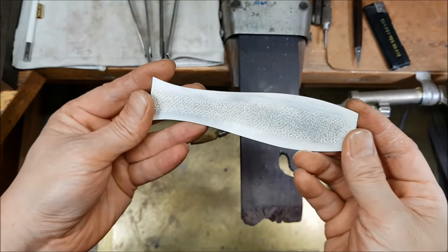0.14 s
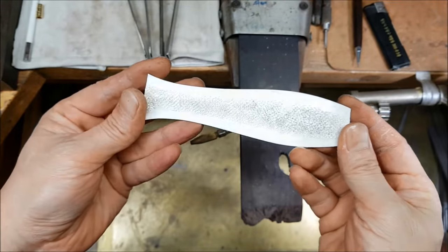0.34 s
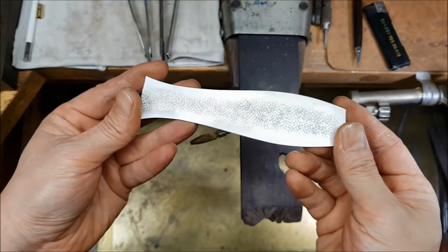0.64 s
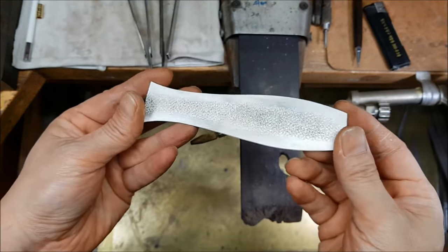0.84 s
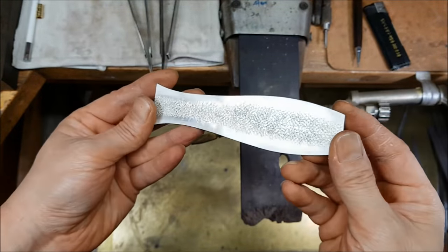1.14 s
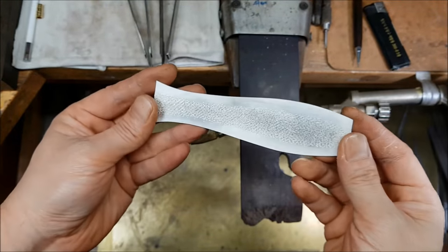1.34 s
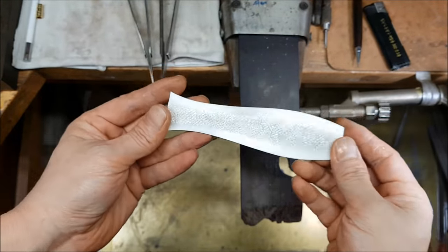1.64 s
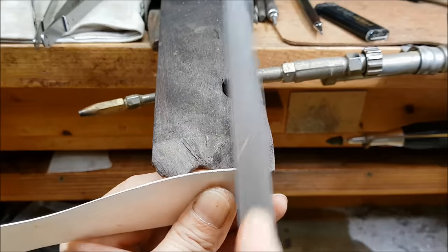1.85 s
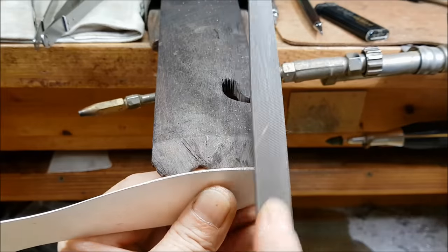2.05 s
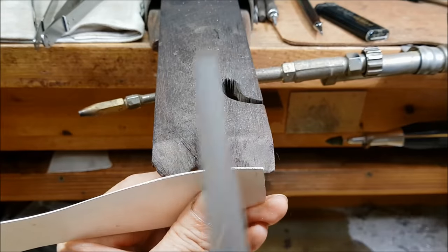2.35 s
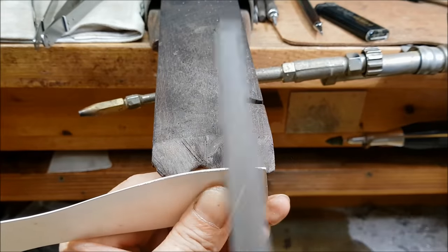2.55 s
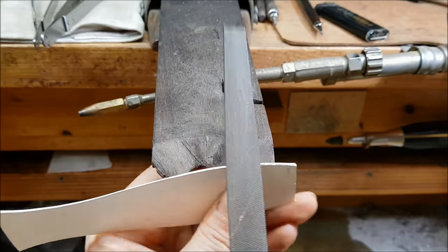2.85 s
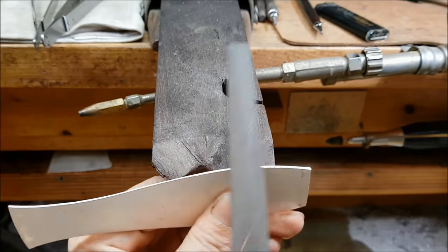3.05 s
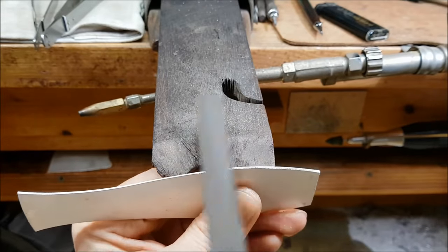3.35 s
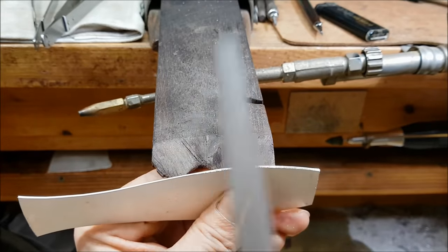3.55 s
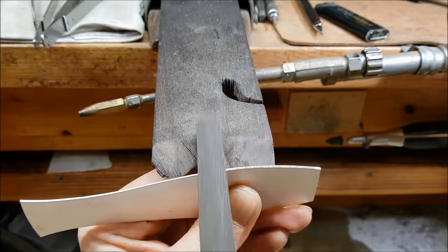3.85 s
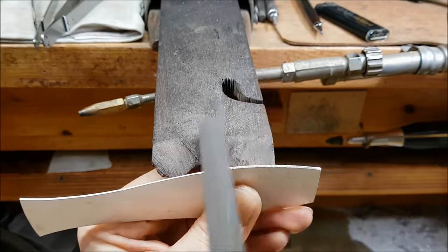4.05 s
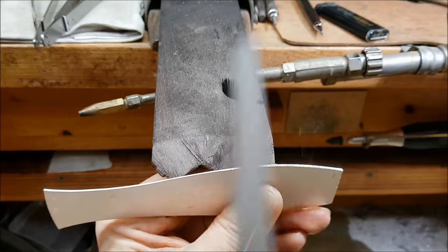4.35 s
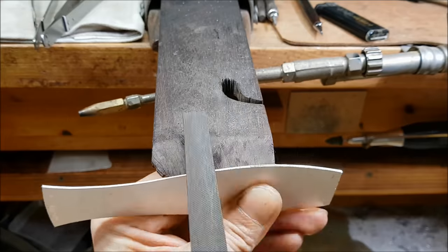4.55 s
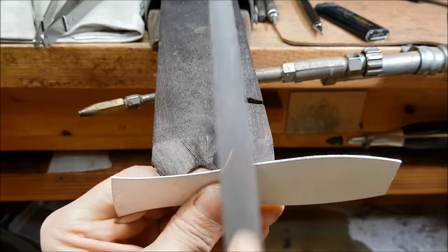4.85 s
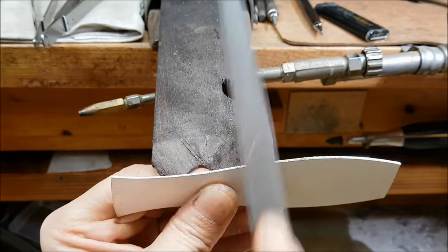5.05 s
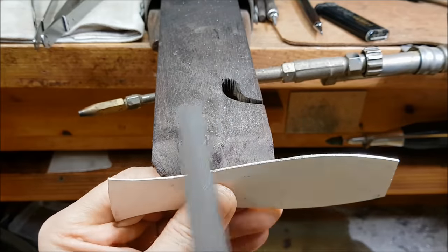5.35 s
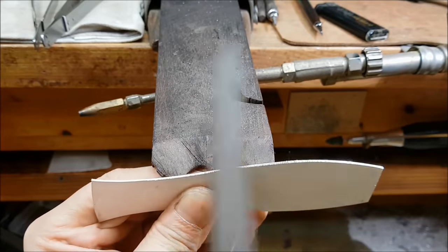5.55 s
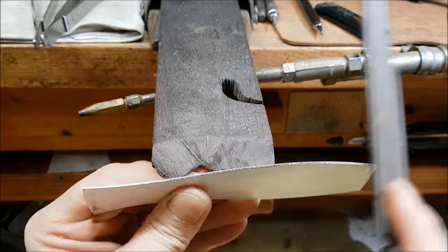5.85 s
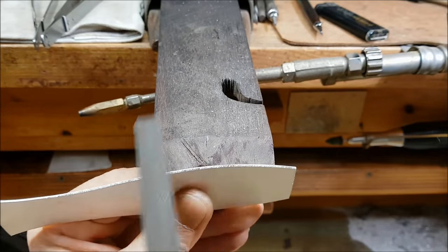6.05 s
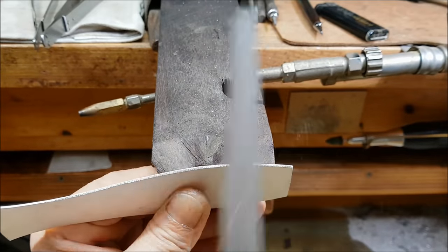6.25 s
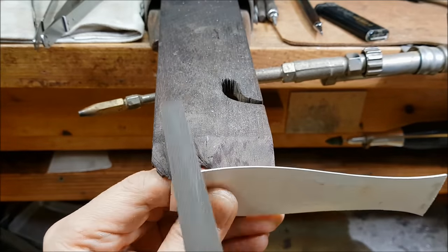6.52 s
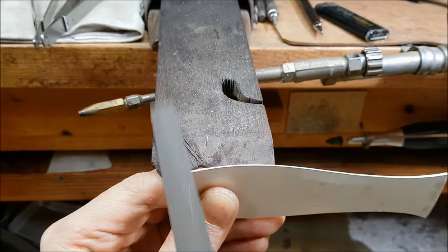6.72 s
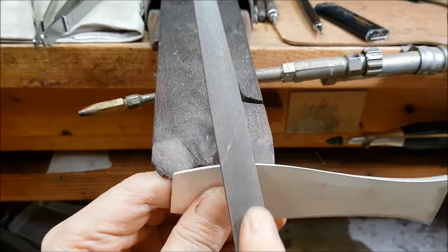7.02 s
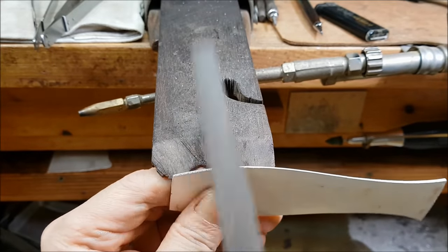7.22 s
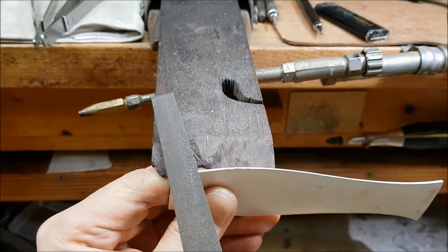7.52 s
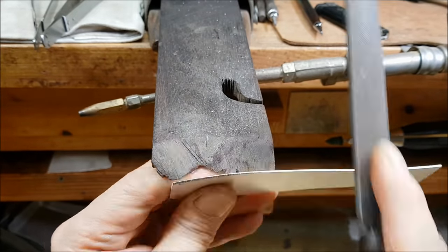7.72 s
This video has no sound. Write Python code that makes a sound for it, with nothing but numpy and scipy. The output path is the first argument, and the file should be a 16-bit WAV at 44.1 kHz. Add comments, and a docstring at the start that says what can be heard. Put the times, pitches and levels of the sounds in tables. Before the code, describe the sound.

After near silence with two faint finger brushes, a hand file rasps rapidly back and forth on thin sheet metal, first slower, then faster and brighter.

```python
"""A jeweller files the edge of a silver blank against a wooden bench pin, heard by a pair of microphones.
Over low rumble, shaped noise, fingers first brush the blank: two faint puffs of noise. Then pushes and pulls
of the file alternate, long ones first, after them quick short ones in another grip. Tooth impulses at a rate
that follows the file's speed, hissing chips and bursts of chatter excite the resonances of the held sheet.
Some teeth snag and ring, the resting file ticks in a pause, and dull bumps gather in the last strokes."""
import sys
import numpy as np
from scipy import signal
from scipy.fft import rfft, irfft, next_fast_len
from scipy.io import wavfile
from scipy.ndimage import uniform_filter1d, map_coordinates

SR = 44100
rng = np.random.default_rng(int(sys.argv[2]) if len(sys.argv) > 2 else 0)


def bounce(signal):
    """Save signal as a 16-bit WAV file at the path given by the first command-line argument."""
    frames = np.transpose(np.atleast_2d(signal))
    limited = np.clip(frames, -1, 1)
    pcm = np.round(limited * 32767).astype(np.int16)
    wavfile.write(sys.argv[1], SR, pcm)


N = 347508

TOP_HZ = 15950  # centre of the upper band edge
SPAN = 8192  # samples in one short sound
T = np.arange(SPAN) / SR
HZ = np.fft.rfftfreq(SPAN, 1 / SR)

# filing starts abruptly here, mid-stroke: t/s
ABRUPT_STARTS = [1.796, 4.832, 6.0, 6.634]
# phase by which the left microphone leads: f/Hz, phase/rad
LEFT_LEAD = [(100, -0.5), (700, 0.32), (1400, 0.47), (2300, 1.5), (4300, 1.01), (7000, 4), (10000, 3.5),
             (16000, 3)]


def amp(db):
    """Amplitude ratio of a level in dB."""
    return 10 ** (np.asarray(db) / 20)


def unit(x):
    """Normalisation to rms 1."""
    return x / np.sqrt(np.mean(x ** 2) + 1e-20)


def along(points, hz):
    """Interpolation of (f/Hz, value) points on a logarithmic frequency axis."""
    f, v = np.transpose(points)
    return np.interp(np.log(hz + 1), np.log(f + 1), v)


def wobble(rate, size=SPAN):
    """Slow random fluctuation: a smooth curve through random knots, rate of them a second."""
    knots = rng.standard_normal(int(size * rate / SR) + 4)
    return map_coordinates(knots, [np.arange(size) * rate / SR])


def causal(gain):
    """Minimum phase: folding the cepstrum makes a response of this gain ring only after its cause."""
    cepstrum = irfft(np.log(np.maximum(gain, 1e-6)))
    cepstrum[..., 1:SPAN // 2] *= 2
    cepstrum[..., SPAN // 2 + 1:] = 0
    return np.exp(rfft(cepstrum))


def band(lo_hz, hi_hz, order=3):
    """Band-pass gain with smooth power-law skirts on both sides."""
    high_pass = 1 + (lo_hz / (HZ + 1)) ** (2 * order)
    low_pass = 1 + (HZ / hi_hz) ** (2 * order)
    return 1 / np.sqrt(high_pass * low_pass)


def noise(colour, alike, size):
    """Partly coherent stereo noise of rms 1, mixed from mid and side; alike is the left-right correlation."""
    turn = np.arccos(np.clip(alike, -1, 1)) / 2
    white = rfft(rng.standard_normal((2, size)))
    mid, side = irfft(white * amp(along(colour, np.fft.rfftfreq(size, 1 / SR))), size)
    return unit(np.cos(turn) * mid + np.sin(turn) * np.array([side, -side]))


def add(track, s, sound):
    """Superposition of a sound on the track from time s."""
    part = track[:, round(s * SR):][:, :sound.shape[-1]]
    part += sound[..., :part.shape[1]]


def rumble():
    """Broadband background: two stationary noises, low and deeper, under slow level curves."""
    # low rumble of the workshop: t/s, level/dB
    low_level = [(0, -71.5), (1.75, -71), (1.84, -63), (2.45, -64), (2.7, -57), (3.3, -54.5), (3.5, -64.5),
                 (4.7, -61.5), (4.9, -74), (5.8, -70), (6.1, -77), (6.7, -75), (7.88, -85)]
    # its spectrum: f/Hz, level/dB
    low_colour = [(12, -50), (35, -39), (60, -23), (96, -5.5), (172, -9), (216, -18.5), (248, -18.5),
                  (367, -24), (558, -28.5), (1000, -32.5), (1610, -35.5), (16000, -46)]
    # deepest rumble: t/s, level/dB
    deep_level = [(0, -73.5), (1.4, -68), (1.9, -80), (3.3, -83), (4.7, -86), (5, -99), (7.88, -91)]
    # its spectrum: f/Hz, level/dB
    deep_colour = [(10, -8), (25, -8.5), (50, 2.5), (80, 0), (160, -34), (600, -80)]
    # the background drops out briefly just before each abrupt start; dip_s is the Gaussian sigma
    dip_db, dip_lead_s, dip_s = -19, 0.013, 0.0063
    t = np.arange(N) / SR
    dips = sum(np.exp(-.5 * ((t - onset + dip_lead_s) / dip_s) ** 2) for onset in ABRUPT_STARTS)
    low = amp(np.interp(t, *np.transpose(low_level))) * noise(low_colour, 0.54, N)
    deep = amp(np.interp(t, *np.transpose(deep_level))) * noise(deep_colour, 0.43, N)
    return amp(dip_db * dips) * (low + deep)


def finger_brushes():
    """Sliding friction: fingertips on the blank make coloured noise under Gaussian envelopes."""
    # each brush: t/s, Gaussian sigma/s, level/dB
    brush_rows = [(0.446, 0.017, -69), (1.358, 0.016, -69.5)]
    # spectrum of the brushes: f/Hz, level/dB
    brush_colour = [(700, -28), (1600, 3), (3300, 0), (6500, 2), (10000, -14), (12500, -9), (16000, -13)]
    t = np.arange(N) / SR
    envelope = sum(amp(db) * np.exp(-.5 * ((t - s) / sigma) ** 2) for s, sigma, db in brush_rows)
    return envelope * noise(brush_colour, .2, N)


def sheet(colour, modes, balance):
    """Modal response from edge to both microphones; the fingers' hold retunes and damps the modes each time."""
    shifts = np.exp(.028 * rng.standard_normal(len(modes)))
    peaks = []
    for (hz, width, db), shift in zip(modes, shifts):
        tuned_hz = hz * shift ** np.clip(1500 / hz, .35, 1)
        damped_width = np.hypot(width, 45 + hz / 55)
        peaks.append(db / (1 + (2 * (HZ - tuned_hz) / damped_width) ** 2))
    sides = np.array([[.5], [-.5]])  # left, right
    gain_db = along(colour, HZ) + np.max(peaks, axis=0) + sides * along(balance, HZ)
    return causal(amp(gain_db)) * np.exp(1j * sides * along(LEFT_LEAD, HZ))


def scatter(t60):
    """Diffuse decay: the sheet's weak overtones and the bench's near echoes, different at each microphone."""
    tail = rng.standard_normal((2, SPAN)) * amp(-60 * T / t60)
    return rfft(tail / np.linalg.norm(tail[0]))


def teeth(rate_hz, jitter, uneven_db):
    """Impulse train: one kick per tooth passed, at the trembling speed of the hand and with uneven bite."""
    passed = np.cumsum(rate_hz * np.exp(jitter * wobble(500))) / SR
    crossing = np.diff(np.floor(passed), prepend=0)
    kicks = crossing * amp(uneven_db * rng.standard_normal(SPAN))
    return unit(kicks - uniform_filter1d(kicks, size=96))  # without the slow mean force


def chips(per_second, uneven_db):
    """Shot noise: dense tiny fractures of random size."""
    torn = rng.random(SPAN) < per_second / SR
    return unit(torn * rng.standard_normal(SPAN) * amp(uneven_db * wobble(706)))


def strokes(grip):
    """Alternating motion in one grip, with a transient: the first strokes of a run cut differently."""
    # turns of the file, each starting a stroke that lasts until the next: t/s, pressure level/dB
    turn_rows = [(1.78, -6.5), (1.882, -0.5), (1.984, 0), (2.076, 1), (2.162, 0.5), (2.253, 0.5),
                 (2.338, 0.5), (2.433, 1), (2.52, 0.5), (2.613, 1), (2.698, 0), (2.782, 0.5), (2.861, -37),
                 (3.144, -10), (3.236, 0), (3.346, 0.5), (3.441, 0), (3.531, 0), (3.622, 1.5), (3.71, 1.0),
                 (3.802, 0), (3.891, 1.5), (3.98, 2), (4.069, 2.5), (4.16, 0), (4.248, 1), (4.331, 1),
                 (4.414, -1), (4.502, 0.5), (4.589, -0.5), (4.674, 1.5), (4.82, -12.5), (4.856, 1.5),
                 (4.92, -1.5), (4.979, 2.5), (5.039, 0.5), (5.094, 2), (5.149, 2), (5.209, 1.5),
                 (5.266, -2), (5.316, 0.5), (5.376, -2), (5.434, 0.5), (5.486, -2), (5.545, -0.5),
                 (5.602, 1), (5.656, 3), (5.712, 3.5), (5.768, 0.5), (5.822, 1.5), (5.88, 0.5), (5.985, 1),
                 (6.037, 1.5), (6.101, 3), (6.164, 3.5), (6.221, 4), (6.283, 3), (6.338, 5.5), (6.397, 0.5),
                 (6.446, 2.5), (6.508, -1.0), (6.62, 4.5), (6.68, -1.5), (6.733, 4), (6.79, 1),
                 (6.849, 4.5), (6.907, 0.5), (6.966, -0.5), (7.022, -1.5), (7.081, -1.5), (7.139, -1.5),
                 (7.196, 0), (7.255, -0.5), (7.318, -3.0), (7.366, 0.5), (7.425, -2), (7.479, -2),
                 (7.535, -3.5), (7.584, -2), (7.639, -7.5), (7.696, -4.5), (7.749, -6.5)]
    # unbroken runs of strokes: stop t/s, 1/e time of the early bite/s, top treble level/dB, grip, first stroke
    run_rows = [(2.984, 0.087, 4, "long", "push"), (4.781, .1, -.5, "long", "push"),
                (5.935, 0.4, -2.5, "short", "push"), (6.554, .16, -1.5, "short", "push"),
                (7.805, 0.33, 2.5, "short", "pull")]
    # how pushes cut, a row per run: nominal tooth rate f/Hz before any slowing, then relative levels of
    # teeth/dB, chips/dB, chatter/dB, extra teeth and chatter of the early bite/dB, and its slowing/octaves
    push_rows = [(2655, -24, -26, -40, 6.5, 0), (2306, -26, -26, -39, 5.5, 0.077),
                 (4330, -33.5, -26, -40.5, 7, .15), (4650, -28, -27.5, -41.5, 0, 1.9),
                 (4090, -33.5, -25, -48, 8.5, .15)]
    # how pulls cut: the same columns
    pull_rows = [(1883, -29.5, -27.5, -35, 0, 0), (1786, -32.5, -27.5, -34.5, -1, 0),
                 (2890, -32.5, -29, -39.5, 6, .5), (3100, -33.5, -28, -39, 2, 0.89),
                 (2740, -31, -30, -36, 1.5, .35)]
    start = 0
    for (stop, settle, treble_db, held, first), push, pull in zip(run_rows, push_rows, pull_rows):
        turns = [row for row in turn_rows if start <= row[0] < stop]
        ends = [s for s, _ in turns[1:]] + [stop]
        start = stop
        if held != grip:
            continue
        for k, ((s, db), end) in enumerate(zip(turns, ends)):
            way = "push" if (k % 2 == 0) == (first == "push") else "pull"
            rate_hz, teeth_db, chips_db, chatter_db, bite_db, slowing = push if way == "push" else pull
            early = np.exp(-((s - turns[0][0]) / settle) ** 2)
            levels = teeth_db + early * bite_db, chips_db, chatter_db + early * bite_db
            yield s, end - s, way, db, rate_hz * 2 ** (-slowing * early), treble_db, levels


def filing(moves, grip, shapes, grab, glide, jitter, tooth_db, chip_db, chatter_db,
           chatter_lo_hz, chatter_hi_hz, pin_db, judder_db, hiss_grows):
    """Source and filter: teeth, chips and chatter follow each stroke's half-sine speed and drive the sheet."""
    step_s = .0005  # time constant of the level step in the stroke shape
    top_treble_hz = 12500  # above this, the hiss changes with the angle of the sheet in each run
    out = np.zeros((2, N))
    crowd = band(1400, 30000, order=2)  # overtones crowd together towards the treble
    for s, length, way, pressure_db, rate_hz, treble_db, (teeth_level, chips_level, chatter_level) in moves:
        teeth_rise, chips_rise, chatter_rise, early_db, early_until_s = shapes[way]
        u = np.clip(T / length, 0, 1)
        speed = np.abs(np.sin(np.pi * u))
        cut = np.tanh(grab * speed * np.sqrt(rate_hz / 2500))  # the faster the file, the sooner the cut deepens
        # a stroke is silent until an abrupt start within it
        silent = sum((s + T < onset) & (s < onset < s + length) for onset in ABRUPT_STARTS)
        press = (1 - silent) * (u < 1) * amp(judder_db * wobble(114.5))
        # with these step times the factor is constant within a stroke and unit() below cancels it
        press = press * amp(early_db * (1 - np.tanh((T - early_until_s) / step_s)) / 2)
        # the contact point wanders along the edge
        path = sheet(*grip) * (1 + 0.55 * crowd * scatter(t60=0.022))

        bite = teeth(rate_hz * (speed + .01) ** glide, jitter, uneven_db=5.5) * amp(2.2 * wobble(99))
        # the whole blade radiates diffusely
        hiss = chips(30000, uneven_db=3.0) + 0.97 * rng.standard_normal((2, SPAN))
        # the sheet shakes in bursts
        chatter = chips(4000, uneven_db=2.65) * amp(2.9 * wobble(94))
        chatter = chatter + 0.24 * rng.standard_normal((2, SPAN))
        pin = chips(3000, uneven_db=1.5)  # the wooden pin drones along

        bite_band = band(rate_hz * .5, rate_hz * 1.66, order=3)
        hiss_band = band(2480, 30000, order=2) * amp(treble_db * band(top_treble_hz, 30000, order=8))
        chatter_band = band(chatter_lo_hz, chatter_hi_hz, order=4)
        pin_band = band(303, 506, order=2)
        layers = [(bite * cut ** 0.1, bite_band, teeth_level + tooth_db, teeth_rise),
                  (hiss * cut * speed ** hiss_grows, hiss_band, chips_level + chip_db, chips_rise),
                  (chatter * cut ** 0.94, chatter_band, chatter_level + chatter_db, chatter_rise),
                  (pin * cut ** 0.27, pin_band, chatter_level + pin_db, chatter_rise)]
        for force, gain, db, rise_db in layers:
            drive = rfft(force * press * amp(rise_db * u))
            sound = irfft(drive * path * causal(gain) * band(1, TOP_HZ, order=30))
            # the level holds over the stroke, not over the whole span
            add(out, s, amp(pressure_db + db) * np.sqrt(length * SR / SPAN) * unit(sound))
    return out


def bumps(rise, t60):
    """Damped impact: the sheet knocks softly on the wooden pin, low noise with a short rise and decay."""
    # each bump: t/s, level/dB
    bump_rows = [(1.864, -36.5), (6.333, -48), (6.638, -51), (6.776, -46), (6.892, -39.5), (6.938, -43.5),
                 (7.042, -40.5), (7.292, -46), (7.4, -41.5), (7.504, -36.5), (7.61, -31.5), (7.721, -47)]
    # spectrum of the bumps: f/Hz, level/dB
    bump_colour = [(25, -25), (70, -19), (200, 4.5), (400, 8), (800, 0.5), (1500, -8), (4000, -49)]
    out = np.zeros((2, N))
    for s, db in bump_rows:
        shape = np.minimum(T / rise, 1) * amp(-60 * np.maximum(T - rise, 0) / t60)
        knock = shape * noise(bump_colour, 0.3, SPAN)
        add(out, s - rise, amp(db) * knock / np.std(knock[:, T < .015]))
    return out


def light_snags():
    """Random events: a tooth may catch in the fast part of a long stroke; rows like the hardest snags."""
    snag_chance, snag_db, snag_s = .6, -32.5, 0.021  # per stroke; level before the stroke's pressure; length/s
    snag_hz, spread_octaves = 1748, .35  # median and standard deviation
    rows = []
    for s, length, _, db, *_ in strokes("long"):
        chance, place, pitch = rng.random(), rng.uniform(0.27, 0.85), rng.standard_normal()
        hz = snag_hz * 2 ** (spread_octaves * pitch)
        if chance < snag_chance:
            rows.append((s + place * length, snag_s, hz, snag_db + db))
    return rows


def snags(ring_db, spit_db, width_hz, t60, lead):
    """Stick-slip: a caught tooth drives one sheet resonance, an unsteady sine, and spits chips as noise."""
    # the hardest snags: t/s, length/s, centre f/Hz, level/dB before the ring and spit levels
    hard_snags = [(1.897, .014, 1186, -26.5), (2.362, .019, 2370, -23), (3.305, 0.029, 1745, -27.5),
                  (3.498, 0.014, 1746, -24.5), (3.588, 0.021, 1191, -26.5), (4.129, 0.015, 2547, -24),
                  (4.128, 0.022, 1265, -27.5), (4.337, 0.013, 1086, -26.5), (4.727, 0.023, 1830, -28),
                  (4.981, 0.018, 1726, -19), (6.011, 0.011, 994, -22.5), (6.136, 0.01, 990, -24.5),
                  (6.345, 0.016, 4380, -25.5), (6.478, 0.015, 4180, -23), (6.635, 0.01, 1996, -23),
                  (6.744, 0.0061, 1850, -23)]
    spit_colour = [(300, -22.0), (1500, -5.0), (5000, 9), (15000, -22.0)]  # f/Hz, level/dB
    out = np.zeros((2, N))
    for s, length, hz, db in hard_snags + light_snags():
        held = (1 - amp(-T * SR / 4)) * amp(-60 * np.maximum(T - length, 0) / t60)
        drift = 2 * np.pi * np.cumsum(width_hz * wobble(297)) / SR  # the slips come unevenly
        ports = np.array([[.5], [-.5]]) * lead * along(LEFT_LEAD, hz)  # phase at left and right
        ring = unit(np.sin(2 * np.pi * hz * T + drift + ports) * amp(1.0 * wobble(200)))
        spit = noise(spit_colour, 0.33, SPAN) * amp(-60 * T / 0.076)
        add(out, s, amp(db) * held * (amp(ring_db) * ring + amp(spit_db) * spit))
    return out


def ticks(body):
    """Impact: the resting steel file touches the edge, a short noise crack and a faint tail through the sheet."""
    # each tick: t/s, level/dB
    tick_rows = [(2.962, -27.5), (3.072, -49)]
    out = np.zeros((2, N))
    for s, db in tick_rows:
        crack = rng.standard_normal(SPAN) * (amp(-60 * T / .024) + .07 * amp(-60 * T / .14))
        sound = irfft(rfft(crack) * body * (1 + scatter(t60=0.011)))
        add(out, s, amp(db) * sound / np.std(sound[:, T < .005]))
    return out


def room(x):
    """Reverberation: the cluttered bench answers briefly, the treble dying first."""
    # decay time: f/Hz, t60/s
    decay = [(200, 0.23), (600, 0.073), (1500, 0.073), (4000, 0.066), (12000, 0.051)]
    out, size = np.zeros((2, N)), SPAN // 4
    # a new random tail is drawn for each short block, so no fixed resonance stands out
    for start in range(0, N, size):
        hz, t, z = signal.stft(rng.standard_normal((2, SPAN)), SR, nperseg=128)
        tail = signal.istft(z * amp(-60 * t / along(decay, hz)[:, None]), SR, nperseg=128)[1]
        tail = tail * np.minimum(np.arange(tail.shape[1]) / SR / 0.00073, 1)
        tail = tail / np.linalg.norm(tail[0])
        add(out, start / SR, signal.fftconvolve(x[:, start:start + size], tail, axes=1))
    return out


def scene():
    """Superposition of filing in two grips, small knocks, their reverberation and the background."""
    # broad colour of the sheet in each grip: f/Hz, level/dB
    long_colour = [(100, -21), (200, -15.5), (300, -7), (500, -11.5), (700, -5), (1100, -6.5), (2000, -2.5),
                   (3500, -9), (6000, -4), (9000, -8.5), (12000, -10), (15000, -12)]
    short_colour = [(100, -22), (200, -20.5), (300, -20), (500, -13), (700, -16.5), (1100, -6), (2000, 4.5),
                    (3500, 1.5), (6000, -3), (9000, 1.5), (12000, -0.5), (15000, -1.5)]
    # its resonances before the hold retunes and damps them: f/Hz, width/Hz, level above the colour/dB
    long_modes = [(296, 400, 2.6), (629, 38, 12.1), (738, 31, 6.7), (936, 35, 12), (1220, 310, 10.8),
                  (1860, 32, 7.5), (2130, 180, 5.2), (2504, 120, 7), (2940, 120, 9.4), (3420, 260, 7.9),
                  (4300, 280, 5.3), (5730, 190, 3), (5930, 91, 1.9), (7300, 89, 3.4), (8430, 100, 4.7),
                  (9086, 63, 2.1), (9650, 152, 2.5), (11100, 610, 4.1), (13400, 69, 10.3),
                  (13700, 156, 4.6), (14780, 310, 10.5)]
    short_modes = [(412, 62, 7.8), (619, 23, 6.9), (963, 74, 12.7), (1415, 48, 9.4), (1773, 134, 8.7),
                   (2070, 130, 5.7), (2790, 64, 5.1), (3420, 34, 0.67), (3620, 48, 2.6), (4450, 340, 5.5),
                   (5130, 310, 5.8), (5540, 160, 5.7), (6330, 580, 8.5), (7280, 120, 2.1), (8360, 87, 3.8),
                   (10480, 250, 3.3), (11200, 110, 5.6), (14000, 230, 3.1), (13760, 170, 3.6),
                   (14399, 100, 2.4)]
    # left minus right microphone: f/Hz, level/dB
    long_balance = [(100, 4.5), (380, -2.5), (700, -0.5), (1300, 0), (2400, 3.5), (4400, 2), (8000, 2),
                    (11000, 2), (14500, 14.5)]
    short_balance = [(100, 8), (380, -2.5), (700, -0.5), (1300, 1), (2400, 0.5), (4400, 1.5), (8000, 1.5),
                     (11000, 3), (14500, 3.5)]
    # stroke shape by direction: growth from start to end of teeth/dB, chips/dB, chatter/dB,
    # then a level step: level before it/dB, t after the turn/s
    long_shape = {"push": (2.5, 8.5, 6.5, -6.5, -0.73), "pull": (4.5, -6.5, -1.5, -3, 1.7)}
    short_shape = {"push": (-0.5, 1.5, -6.5, -9, 0.43), "pull": (-4.5, -2, 1.5, -5, 0.76)}
    long_grip = long_colour, long_modes, long_balance
    short_grip = short_colour, short_modes, short_balance
    work = filing(strokes("long"), long_grip, long_shape, grab=2.25, glide=.6, jitter=0.13,
                  tooth_db=-3.5, chip_db=0.5, chatter_db=1.0, chatter_lo_hz=488, chatter_hi_hz=1370,
                  pin_db=-9.5, judder_db=1.1, hiss_grows=0.43)
    work = work + filing(strokes("short"), short_grip, short_shape, grab=1.58, glide=0.32, jitter=.15,
                         tooth_db=-2.5, chip_db=0, chatter_db=0.0, chatter_lo_hz=634, chatter_hi_hz=1220,
                         pin_db=-8.5, judder_db=1.2, hiss_grows=0.48)
    work = work + bumps(rise=0.00493, t60=0.025)
    work = work + snags(ring_db=-1.0, spit_db=-3.0, width_hz=64, t60=0.03, lead=1.55)
    work = work + ticks(sheet(*long_grip))
    return work + amp(-9.5) * room(work) + rumble() + finger_brushes()


def record(dry):
    """Band limitation: a sine-squared edge 300 Hz wide about TOP_HZ, with nothing passed above it."""
    size = next_fast_len(N + SPAN)
    passed = np.clip((TOP_HZ + 150 - np.fft.rfftfreq(size, 1 / SR)) / 300, 0, 1)
    return irfft(rfft(dry, size) * np.sin(np.pi / 2 * passed) ** 2, size)[:, :N]


dry = scene()
out = record(dry)
bounce(out)
```